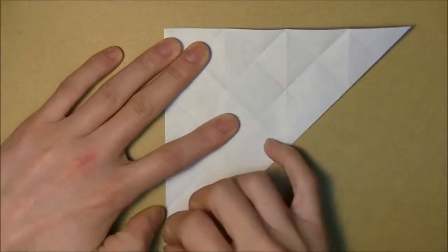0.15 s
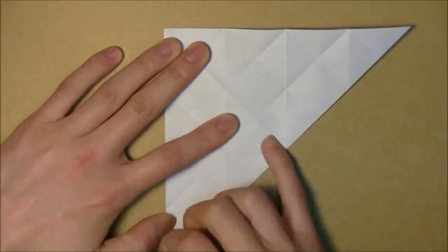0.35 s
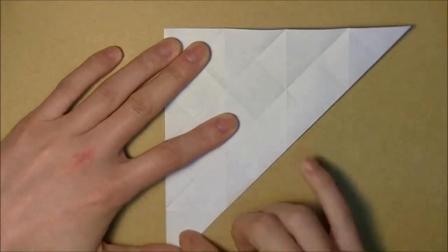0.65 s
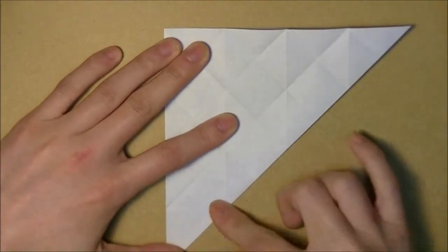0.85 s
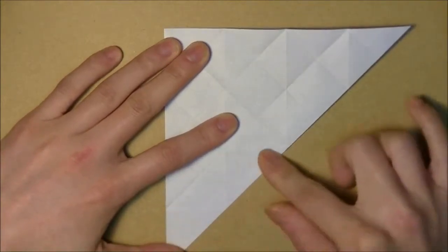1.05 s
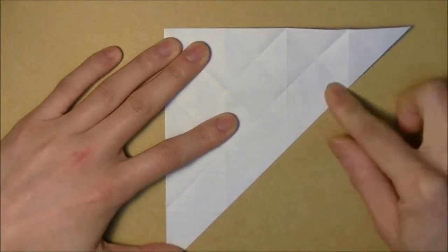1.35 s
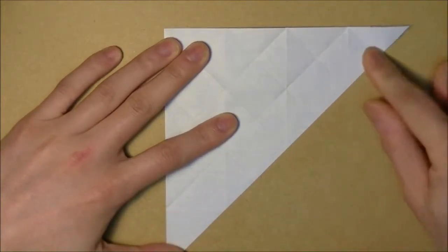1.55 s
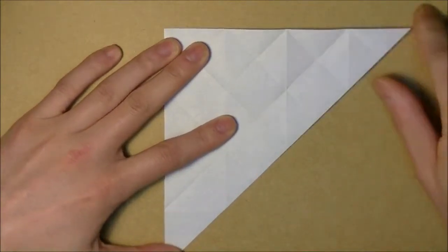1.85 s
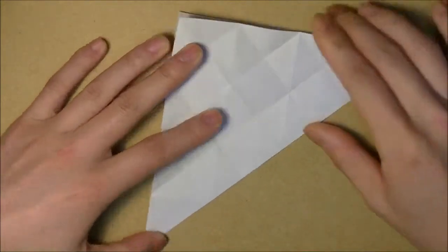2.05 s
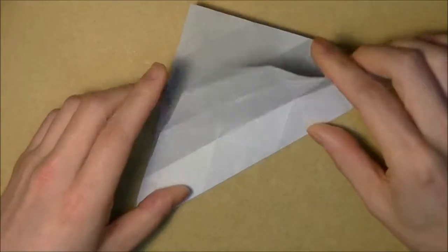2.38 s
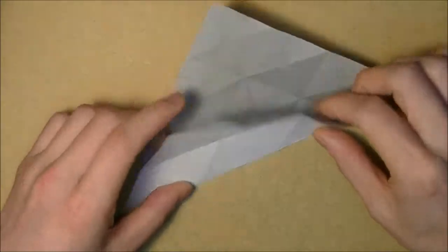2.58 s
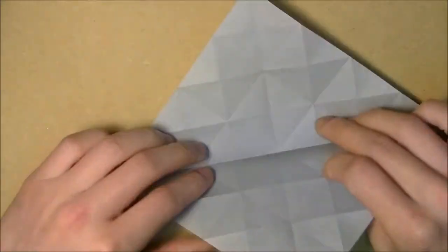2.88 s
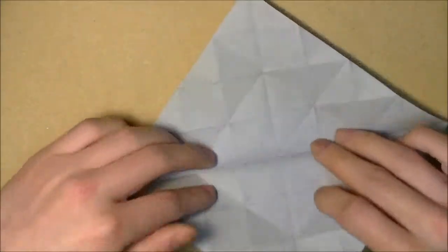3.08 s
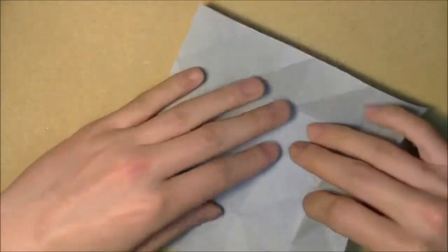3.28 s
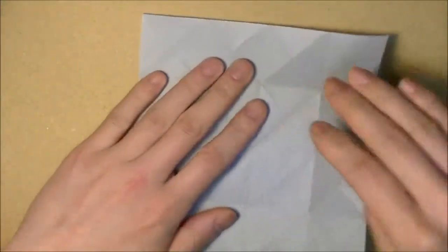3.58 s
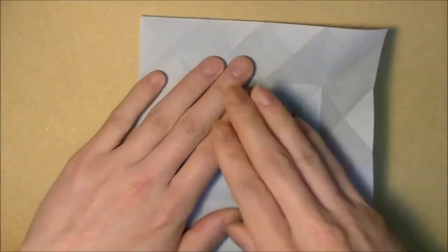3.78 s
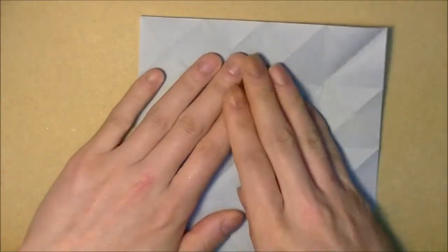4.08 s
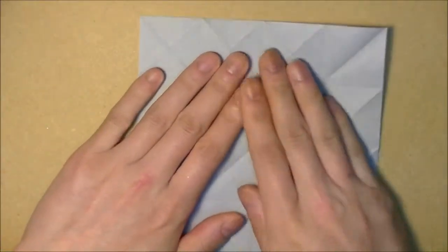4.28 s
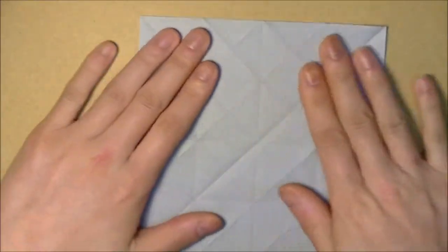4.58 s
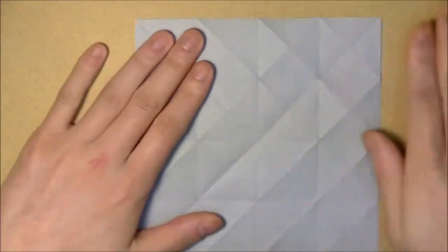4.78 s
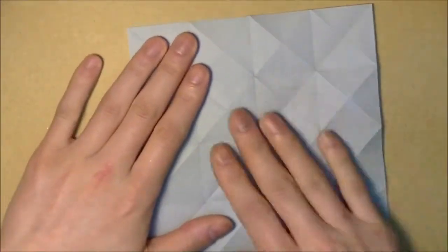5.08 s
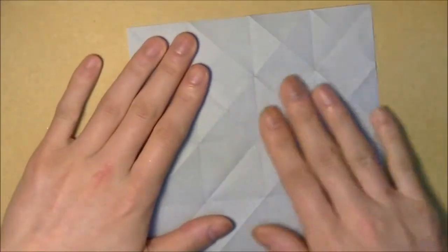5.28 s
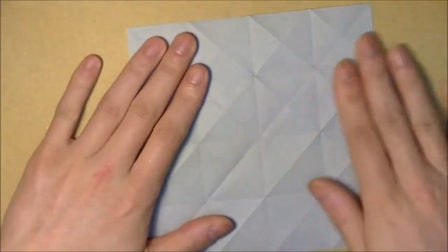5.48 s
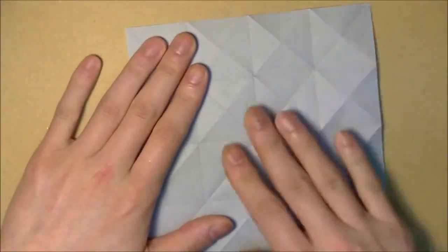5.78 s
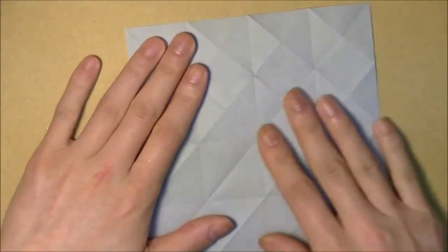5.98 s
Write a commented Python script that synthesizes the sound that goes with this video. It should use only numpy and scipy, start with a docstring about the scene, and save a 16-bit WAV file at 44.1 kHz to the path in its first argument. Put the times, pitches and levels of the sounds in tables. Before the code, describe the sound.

Close stereo microphones in a quiet room catch a fingertip creasing folded paper: soft skin hiss, light rustles, a dull desk thump and a few small pops. The sheet is then lifted and unfolded with dense rustling and loud, crisp snaps, before palms smooth it flat in airy strokes. A faint motor ticks rapidly for about a second during the smoothing.

```python
"""Paper creased and smoothed on a desk

A fingertip creases a folded sheet, opens it and smooths it flat in a quiet room.
Rubbing (skin hiss, sheet rustle, desk drag) is flickering band noise, gated slide by slide.
Buckles snap and crumples swell as fast-dying noise bursts through a panel resonance.
Struck resonances give the desk thumps and a small motor ticking for a second beside the microphones.
Short echoes follow the paper; steady noise fills the room."""
import sys
import numpy as np
from scipy import signal
from scipy.fft import rfft, irfft, next_fast_len
from scipy.io import wavfile

SR = 44100
rng = np.random.default_rng(int(sys.argv[2]) if len(sys.argv) > 2 else 0)


def int16_out(signal):
    """Quantize to a 16-bit WAV file."""
    q = np.round(np.clip(np.atleast_2d(signal).T, -1, 1) * 32767)
    wavfile.write(sys.argv[1], SR, q.astype(np.int16))


N = 270774

# Room noise density: f/Hz, relative density/dB per Hz
ROOM_DENSITY = [(25, -11), (120, -16.5), (260, -5), (600, -1.5), (1200, -1.5), (2500, -6.5), (6700, -3.5),
                (9000, -9), (15500, -21.5)]
# Room stereo width: f/Hz, side re mid/dB
ROOM_WIDTH = [(60, 9.5), (180, 4), (550, 7), (1650, 2.5), (4970, -2), (15000, 1)]
# Paper stereo width: f/Hz, side re mid/dB
PAPER_WIDTH = [(60, 1), (180, -8), (1650, -25), (4970, -15), (15000, -8.5)]
# Sliding hands and sheet: start/s, length/s, rustle/dB, skin/dB, drag/dB, swell start to end/dB
SLIDES = [(-.06, 0.19, -60, -56, -71, -21), (0.112, 0.23, -63.5, -67, -77, 9),
          (0.257, 0.17, -64.5, -62, -63, -14), (0.435, 0.15, -60.5, -57, -72, 5),
          (0.579, 0.11, -89, -60, -80, -14), (0.727, 0.41, -74, -63, -77, 10),
          (0.99, 0.89, -70, -69, -67, 0), (1.105, 0.6, -64, -67, -86, -4),
          (1.813, 0.13, -60.5, -63, -69.5, 2), (1.916, 0.19, -56.5, -59.5, -73, 7.5),
          (2.047, 0.28, -60, -61, -69.5, 0), (2.223, 0.14, -57, -59, -64, 1),
          (2.267, 0.19, -65.5, -68, -64.5, 12), (2.433, 0.068, -58.5, -67, -57, -2),
          (2.466, 0.17, -60, -64.5, -61.5, 5), (2.574, 0.17, -55.5, -56, -55.5, 9),
          (2.665, 0.57, -56.5, -64, -59, 4), (2.743, 0.094, -57, -55, -44.5, 8),
          (2.873, .18, -55, -61, -53.5, 7), (3.053, 0.11, -52, -57.5, -54, -13),
          (3.143, 0.27, -54, -52, -60.5, 6), (3.252, 0.094, -46, -52, -74, -3),
          (3.356, 0.1, -55, -57, -58, -3), (3.372, 0.46, -56.5, -58.5, -62.5, -18.5),
          (4.188, 0.33, -60.5, -56.5, -65, 9.5), (4.43, 0.6, -59.5, -54, -67.5, -3.5),
          (4.688, 0.17, -82, -53, -65, 6), (4.856, 0.09, -66, -57, -68.5, -1),
          (5.162, 0.039, -54, -56, -62, -8), (5.189, 0.43, -62.5, -53, -69, -4),
          (5.493, 0.14, -58, -54, -65, -5), (5.903, 0.29, -64.5, -55, -73.5, 1)]
# Hands at rest, one row each: rustle, skin, drag; level/dB
RESTING_LEVELS = [
    [-78],
    [-79],
    [-87],
]
# Sheet rustle density: f/Hz, relative density/dB per Hz
RUSTLE_DENSITY = [(1800, -38), (2500, 1.5), (3200, -1.5), (4300, 2), (5600, -0.5), (6700, -3.5),
                  (9000, -9.5)]
# Skin hiss density: f/Hz, relative density/dB per Hz
SKIN_DENSITY = [(4500, -8), (6700, -1.5), (9000, 1), (11000, -2.5), (13000, -6.5), (15500, -13)]
# Desk drag density: f/Hz, relative density/dB per Hz
DRAG_DENSITY = [(250, -15.5), (450, 1.5), (800, 1.5), (1050, 6), (1350, 2.5), (1900, 7), (3300, 2.5)]
# Changing hollow under hands and sheet: t/s, favoured rustle f/Hz, favoured drag f/Hz
HOLLOW = [(0, 4500, 1050), (.9, 4720, 1120), (1.2, 3300, 1110), (1.7, 3220, 1500), (2.1, 5400, 1290),
          (2.4, 3700, 885), (3.3, 3200, 780), (3.5, 3430, 1840), (4.3, 2970, 1110), (4.45, 2770, 1170),
          (4.6, 3140, 1960), (4.95, 3140, 1960), (5.45, 3120, 1260), (6.14, 3200, 1150)]
# Soft crumples: t/s, panel peak level/dB, panel f/Hz, crack re panel/dB, desk knock re panel/dB
CRUMPLES = [(0.317, -41.5, 2550, -6, -13), (0.343, -44.5, 2630, -2, -12), (0.37, -46.5, 1090, -17, -17),
            (0.560, -44.5, 1180, -18, -22), (2.098, -39.5, 4370, -28, -21), (2.547, -43.5, 1230, -25, -30),
            (3.241, -36, 4400, -3.5, -21), (3.407, -34, 1790, -20, -15), (4.443, -42, 2940, 2, -32),
            (5.308, -43, 2960, -1, -11.5), (5.547, -42.5, 2260, -16, -29), (5.907, -48, 4200, -5, -28)]
# Buckles popping: t/s, panel peak level/dB, panel f/Hz, crack re panel/dB, desk knock re panel/dB
SNAPS = [(0.5443, -31.5, 2900, 0.5, -17), (1.0114, -25, 4530, -9, -36), (1.3663, -37, 4700, -34, -36),
         (1.3675, -42, 1700, -30, -26), (1.5485, -34, 5000, -3, -41), (1.5497, -35.5, 1890, -30, -35),
         (2.356, -39, 1720, -26, -12.5), (2.4132, -36.5, 4180, -1, -27), (2.6256, -35.5, 1230, -7, -34),
         (2.692, -23, 3900, -28, -25), (2.7525, -12, 5270, -8, -21.5), (2.7903, -14, 2570, -9.5, -46),
         (2.904, -34.5, 3080, -25, -27), (2.928, -40, 1500, -22, -15), (2.9506, -18.5, 2880, -44, -32),
         (2.988, -40, 4800, -3, -28), (3.0072, -34, 2840, -26, -15), (3.225, -42, 1540, -25, -5),
         (3.076, -22, 2430, -29, -22.5), (3.0796, -12, 3260, -14.5, -27.5), (3.178, -20, 2150, -35, -28),
         (3.2716, -30, 4730, -24, -35), (3.289, -36, 3300, -20, -26), (3.398, -38, 3580, -18, -15),
         (3.8643, -39, 3800, -37, -30), (4.0546, -39, 4170, -2, -17), (4.2012, -46, 1120, -3, -9),
         (4.231, -44, 3320, -19, -16), (5.1678, -36.5, 4430, -7, -36), (5.175, -40.5, 2050, -4, -32),
         (5.195, -44.5, 3020, -4, -37), (5.181, -45.5, 1210, -16, -16), (5.896, -49.5, 4400, -3, -16),
         (5.900, -47, 2200, -15, -15), (5.991, -47.5, 1810, -20, -22), (6.024, -52, 1000, -20, -6)]
# Knuckle landing on the desk: t/s, level/dB
THUMPS = [(0.32, -53.5), (0.548, -67)]
# Motor ticking: t/s, level/dB
MOTOR_LEVEL = [(4.35, -53), (4.38, -57), (4.8, -57), (4.95, -55), (5.25, -57)]

ROOM_NOISE_DB = -65
PAPER_LEFT_DB = 0.6   # left re right
LIFTED_FROM_S, LIFTED_TO_S = 1.95, 3.2   # sheet off the desk, flexing
SLIDE_ATTACK_S, SLIDE_RELEASE_S = 0.068, 0.029   # each at most half the slide
RELEASE_PER_LENGTH = 0.12   # added release: long slides slow down more gently
HOLLOW_DB, HOLLOW_OCTAVES, HOLLOW_OVERTONE = 9, .17, 1.58   # second lift at that ratio
ECHO_DB, RUBBING_ECHO_DB, ECHO_T60_S = -16, -13, 0.22
DESK_DAMPING, DESK_ECHO_DB = .7, -4   # flat sheet: T60 factor, added pop echo level
SNAP_RISE_S, CRUMPLE_RISE_S, CRUMPLE_STRETCH = .0003, 0.00223, 1.73
SNAP_T60_S, T60_PITCH_POWER = 0.036, -0.39   # lifted, at 3000 Hz; higher panels die sooner
LIFTED_SHEET_LOW_HZ, FLAT_SHEET_LOW_HZ = 1660, 2520   # highest lower edge of the whole-sheet band
CRINKLES, CRINKLE_DB, CRINKLE_SPREAD_DB = 24, -42, 4   # small random pops, level +/- spread
UNFOLD_FROM_S, UNFOLD_S = 2.64, .86   # sheet unfolds and settles
THUMP_HZ, THUMP_RING_S = 242, 0.099   # ring_s sets the mode width, 4.4 / ring_s
MOTOR_FROM_S, MOTOR_STEP_S = 4.274, 1 / 30
MOTOR_HZ, MOTOR_RING_S, WEAK_STEP_DB = 955, 0.026, -3.5
DIP_HZ, DIP_WIDTH_HZ, DIP_SHARE = 6310, 4150, 0.64   # microphones hear less here
STOPBAND_HZ = 16100


def amp(db):
    """dB to gain."""
    return 10 ** (np.asarray(db) / 20)


def rms_one(x):
    """Scale to rms 1."""
    return x / np.sqrt(np.mean(x ** 2) + 1e-20)


def at_hz(points, hz):
    """Read a table on a log-frequency axis."""
    table_hz, values = np.array(points).T
    return np.interp(np.log(hz), np.log(table_hz), values)


def in_time(rows):
    """Columns of a curve table, sample by sample."""
    s, *columns = np.transpose(rows)
    return [np.interp(np.arange(N) / SR, s, c) for c in columns]


def drift(rate_hz):
    """Slow random wander: noise through two equal poles at rate_hz, rms 1."""
    step = 40   # samples per drawn value
    r = np.exp(-2 * np.pi * rate_hz * step / SR)
    noise = rng.standard_normal(N // step + 2002)
    slow = signal.lfilter([1], [1, -2 * r, r * r], noise)[2000:]   # settled part
    return np.interp(np.arange(N) / step, np.arange(len(slow)), rms_one(slow))


def resonate(x, hz, width_hz):
    """One two-pole resonance, gain about 1 on top."""
    r = np.exp(-np.pi * width_hz / SR)
    zeros = [(1 - r * r) / 2, 0, (r * r - 1) / 2]
    poles = [1, -2 * r * np.cos(2 * np.pi * hz / SR), r * r]
    return signal.lfilter(zeros, poles, x)


def resonate_twice(x, hz, width_hz):
    """Two equal resonances in series: steeper skirts, softer start."""
    return resonate(resonate(x, hz, width_hz), hz, width_hz)


def soft_ring(clicks, hz, ring_s):
    """Clicks through the same mode twice: a soft start, then a ring; peak 1."""
    ring = resonate_twice(clicks + 1e-18, hz, 4.4 / ring_s)
    return ring / np.abs(ring).max()


def stereo(mid, side, side_table):
    """Left and right from mid and side, the side coloured by its table."""
    size = next_fast_len(N)
    hz = np.maximum(np.arange(size // 2 + 1) * SR / size, 1)
    side = irfft(rfft(side, size) * amp(at_hz(side_table, hz)), size)[:N]
    return np.array([mid + side, mid - side])


def banded(pair, density, patchiness, flicker_hz, favoured_hz=None):
    """Fifth-octave bands, each with its level and flicker, lifted near a moving pitch; mid rms 1."""
    out, power, together = 0, 0, drift(flicker_hz)
    low_hz, high_hz = density[0][0], density[-1][0]
    edges = low_hz * 2 ** np.arange(-.5, np.log2(high_hz / low_hz) + .4, .2)
    edges = np.minimum(edges, .45 * SR)
    for k, (low, high) in enumerate(zip(edges, edges[1:])):
        band_pass = signal.butter(2, [low, high], "band", fs=SR, output="sos")
        band = signal.sosfilt(band_pass, pair) * (-1) ** k   # alternate polarity
        hz = np.sqrt(low * high)
        db = at_hz(density, hz)
        if favoured_hz is not None:
            for lift_hz in (favoured_hz, HOLLOW_OVERTONE * favoured_hz):
                octaves = np.log2(hz / lift_hz)
                db = db + HOLLOW_DB * np.exp(-(octaves / HOLLOW_OCTAVES) ** 2)
        power = power + amp(2 * db) * hz
        flicker_db = patchiness * (0.66 * together + 1.15 * drift(flicker_hz))
        out = out + band * amp(db + flicker_db)
    out = out / np.sqrt(power)   # the lift moves the colour, not the level
    return out / np.sqrt(np.mean(out[0] ** 2))


def room_noise():
    """Steady room noise: coloured bands with a slow, slight flicker."""
    white = rng.standard_normal((2, N))
    room = banded(white, ROOM_DENSITY, patchiness=0.7, flicker_hz=4.0)
    return stereo(*(amp(ROOM_NOISE_DB) * room), ROOM_WIDTH)


def slide_levels():
    """Rustle, skin and drag in dB: each slide rises, swells steadily and falls; powers add."""
    t, power = np.arange(N) / SR, amp(RESTING_LEVELS) ** 2
    for start, length, *levels_db, swell_db in SLIDES:
        since = t - start
        attack_s = min(SLIDE_ATTACK_S, length / 2)
        release_s = min(SLIDE_RELEASE_S + RELEASE_PER_LENGTH * length, length / 2)
        edge = np.clip(np.minimum(since / attack_s, (length - since) / release_s), 0, 1)
        swell = amp(swell_db * np.clip(since / length - .5, -.5, .5))
        shape = np.sin(np.pi / 2 * edge) ** 2 * swell
        power = power + (amp(levels_db)[:, None] * shape) ** 2
    return 10 * np.log10(power)


def fibres(per_s, spread_db):
    """Two unrelated streams of tiny slips of uneven size on a bed of noise."""
    sizes = amp(spread_db * np.minimum(rng.exponential(1, (2, N)), 3))
    slips = sizes * (rng.random((2, N)) < per_s / SR)
    return (1 + slips) * rng.standard_normal((2, N))


def rubbing():
    """Sheet, skin and desk rub with their own colours; sheet and desk slip, skin hisses smoothly."""
    rustle_db, skin_db, drag_db = slide_levels()
    rustle_hz, drag_hz = in_time(HOLLOW)
    crinkles_per_s = 300 * amp(rustle_db + 64.5)   # harder handling crinkles more often
    sheet_slips = fibres(crinkles_per_s, spread_db=6.0)
    rustle = banded(sheet_slips, RUSTLE_DENSITY, patchiness=2.0, flicker_hz=28.0, favoured_hz=rustle_hz)
    skin = banded(rng.standard_normal((2, N)), SKIN_DENSITY, patchiness=1.3, flicker_hz=12.6)
    desk_slips = fibres(300, spread_db=4.0)
    drag = banded(desk_slips, DRAG_DENSITY, patchiness=1.57, flicker_hz=28.0, favoured_hz=drag_hz)
    return amp(rustle_db) * rustle + amp(skin_db) * skin + amp(drag_db) * drag


def with_echoes(pops, rubs):
    """Desk, hands and near walls send back a short dense tail, its own for mid and side."""
    t = np.arange(round(.2 * SR)) / SR
    decay = amp(-60 * t / ECHO_T60_S) * np.clip(t / 0.0054, 0, 1)
    tail = rng.standard_normal((2, len(t))) * decay
    tail = signal.lfilter([.6], [1, -.4], tail)   # duller
    tail = tail / np.sqrt(np.sum(tail ** 2, axis=1, keepdims=True))   # energy 1
    now = np.arange(N) / SR
    on_desk = (now < LIFTED_FROM_S) | (now > LIFTED_TO_S)
    sent = amp(ECHO_DB + DESK_ECHO_DB * on_desk) * pops[:1] + amp(RUBBING_ECHO_DB) * rubs[:1]
    return pops + rubs + signal.fftconvolve(sent, tail, axes=1)[:, :N]


def pop_parts(hz, rise, t, stretch, on_desk):
    """Fast-dying bursts: a paper panel, a brighter shorter crack, a duller longer knock."""
    t60 = SNAP_T60_S * (hz / 3000) ** T60_PITCH_POWER * stretch * DESK_DAMPING ** on_desk
    white = rise * rng.standard_normal((3, 2, len(t)))
    bursts = [w * amp(-60 * t / (t60 * longer)) for w, longer in zip(white, (1, .6, 1.6))]
    sheet_low_hz = min(0.74 * hz, FLAT_SHEET_LOW_HZ if on_desk else LIFTED_SHEET_LOW_HZ)
    sheet_band = signal.butter(3, [sheet_low_hz, 6000], "band", fs=SR, output="sos")
    crack_band = signal.butter(4, [7400, 11000], "band", fs=SR, output="sos")
    knock_band = signal.butter(2, [550, 950], "band", fs=SR, output="sos")
    whole_sheet = signal.sosfilt(sheet_band, bursts[0])
    panel = resonate_twice(bursts[0], hz, 0.34 * hz) + 0.59 * whole_sheet
    return panel, signal.sosfilt(crack_band, bursts[1]), signal.sosfilt(knock_band, bursts[2])


def crumples_and_snaps():
    """Crumples swell gently; buckles and random unfolding crinkles start suddenly."""
    out, t = np.zeros((2, N + 4000)), np.arange(4000) / SR
    gentle = np.clip(t / CRUMPLE_RISE_S, 0, 1) ** 2
    sudden = np.clip(t / SNAP_RISE_S, 0, 1) * (1 + 2 * np.exp(-t / 0.0012))   # sharpest at first
    crinkles = [(UNFOLD_FROM_S + u * UNFOLD_S, CRINKLE_DB + CRINKLE_SPREAD_DB * (2 * v - 1),
                 1200 * 4 ** w, -15, -20)
                for u, v, w in rng.random((CRINKLES, 3))]
    rows = [(row, gentle, CRUMPLE_STRETCH) for row in CRUMPLES]
    rows += [(row, sudden, 1) for row in [*SNAPS, *crinkles]]
    for (s, peak_db, hz, crack_db, knock_db), rise, stretch in rows:
        on_desk = not LIFTED_FROM_S < s < LIFTED_TO_S
        parts = pop_parts(hz, rise, t, stretch, on_desk)
        at = round(s * SR)
        for part, db in zip(parts, (0, crack_db, knock_db)):
            out[:, at:at + len(t)] += amp(peak_db + db) * part / np.abs(part[0]).max()
    return out[:, :N]


def thump():
    """The desk top answers soft, scuffing blows: a low ring under a short rough scrape."""
    click, scuff, white = np.zeros(N), 0, rng.standard_normal(N)
    for s, db in THUMPS:
        since = np.arange(N) / SR - s
        click[round(s * SR)] = amp(db)
        fade_s = np.where(since < 0, .006, .02)   # grows before the blow, fades after
        scuff = scuff + amp(db) * white * np.exp(-np.abs(since) / fade_s)
    ring = click.max() * soft_ring(click, THUMP_HZ, THUMP_RING_S)
    scrape = resonate(resonate(scuff, 340, 520), 510, 800)
    return ring + 4.9 * scrape


def motor(count=30):
    """Evenly spaced steps, strong and weak in turn, ring the housing."""
    steps, clicks = np.arange(count), np.zeros(N)
    at = np.round((MOTOR_FROM_S + steps * MOTOR_STEP_S) * SR).astype(int)
    clicks[at] = amp(WEAK_STEP_DB * (steps % 2) + rng.normal(0, 1.5, count))
    return amp(*in_time(MOTOR_LEVEL)) * soft_ring(clicks, MOTOR_HZ, MOTOR_RING_S)


def scene():
    """Paper a little to the left, wide room noise, central thumps, motor slightly louder on the right."""
    paper = stereo(*with_echoes(crumples_and_snaps(), rubbing()), PAPER_WIDTH)
    paper = paper * amp([[PAPER_LEFT_DB / 2], [-PAPER_LEFT_DB / 2]])
    return room_noise() + paper + thump() + motor() * amp([[-1.0], [1.0]])   # left, right dB


def record(dry):
    """A dip in the microphones' response; the top is cut."""
    heard = dry - DIP_SHARE * resonate(dry, DIP_HZ, DIP_WIDTH_HZ)
    top_cut = signal.cheby2(20, 60, STOPBAND_HZ, fs=SR, output="sos")
    return signal.sosfilt(top_cut, heard)


dry = scene()
out = record(dry)
int16_out(out)
```